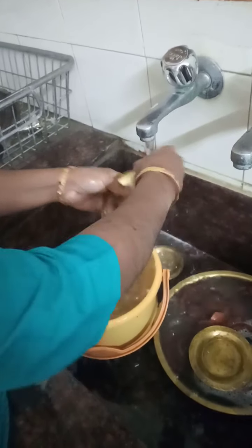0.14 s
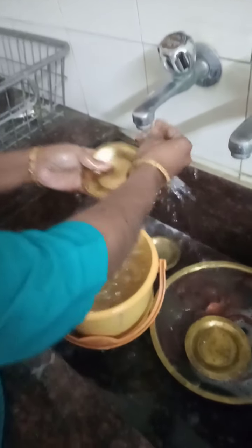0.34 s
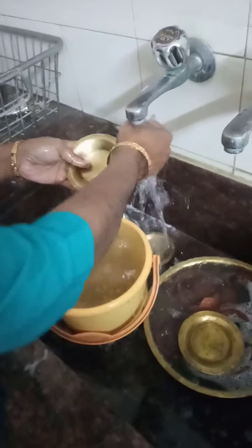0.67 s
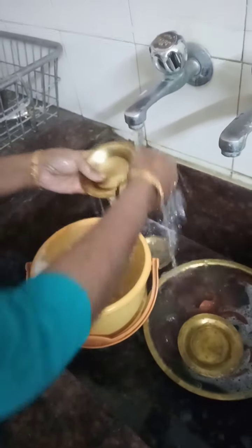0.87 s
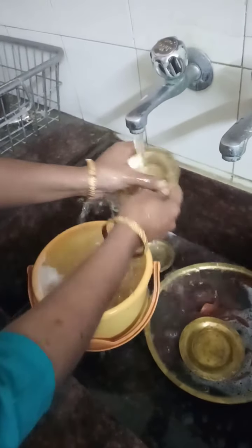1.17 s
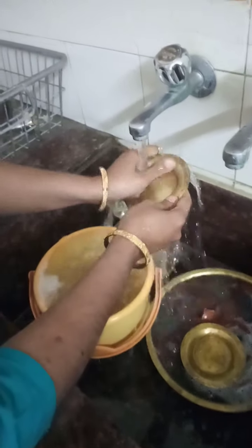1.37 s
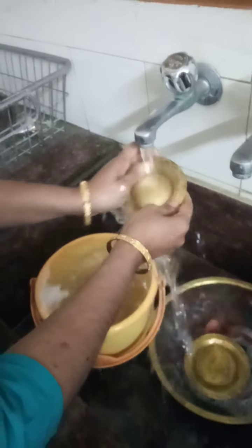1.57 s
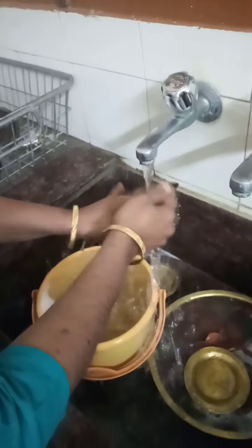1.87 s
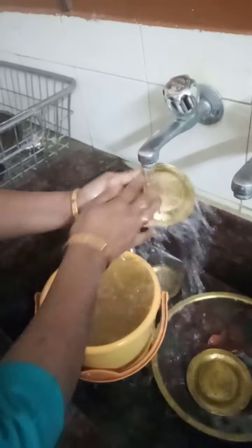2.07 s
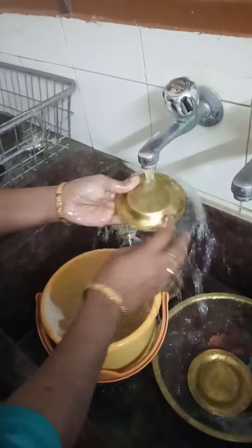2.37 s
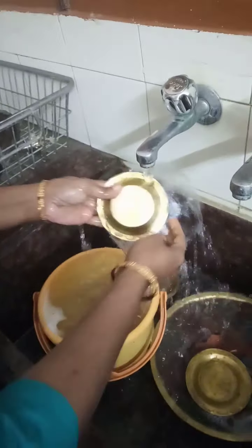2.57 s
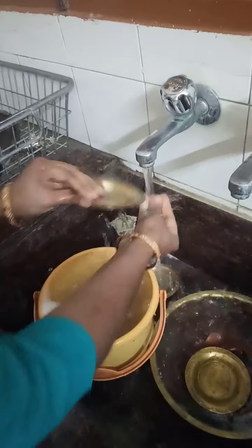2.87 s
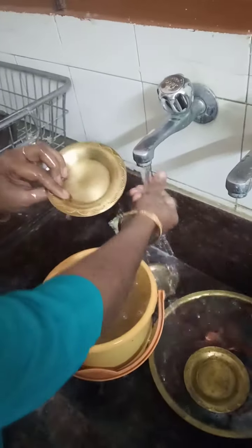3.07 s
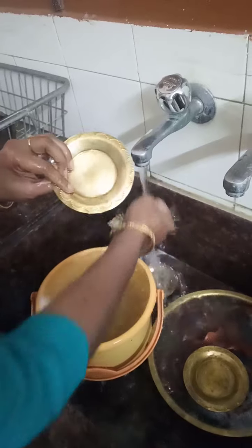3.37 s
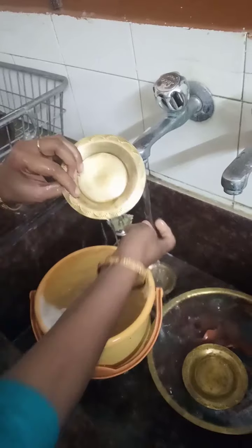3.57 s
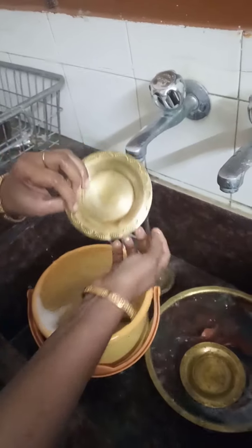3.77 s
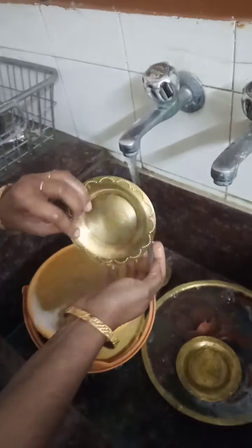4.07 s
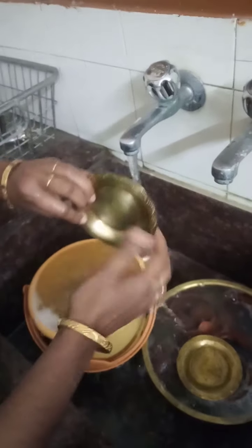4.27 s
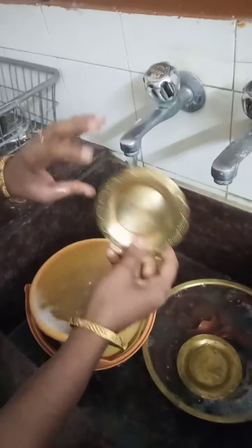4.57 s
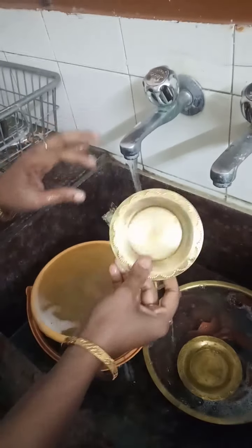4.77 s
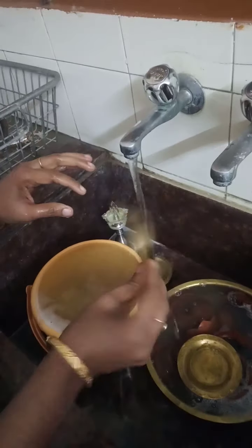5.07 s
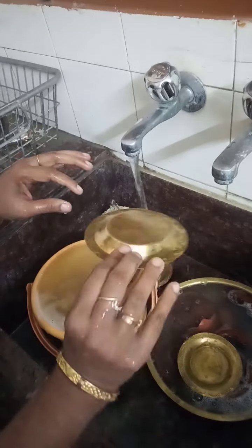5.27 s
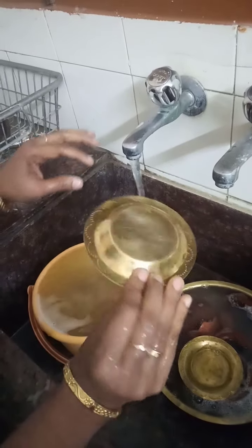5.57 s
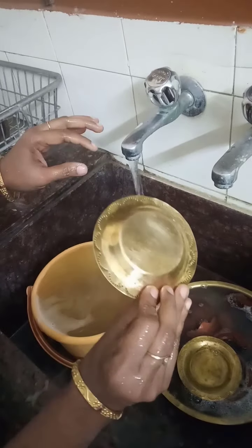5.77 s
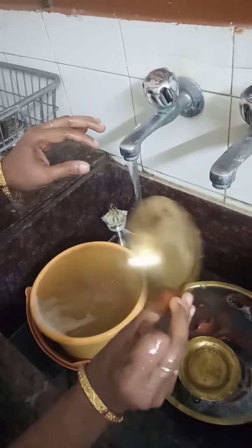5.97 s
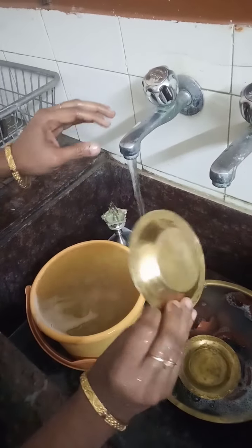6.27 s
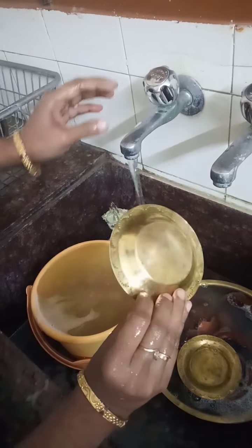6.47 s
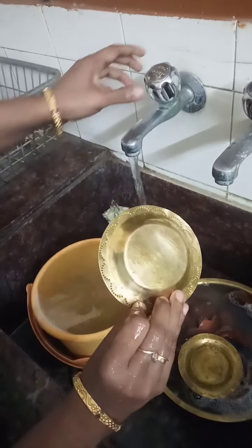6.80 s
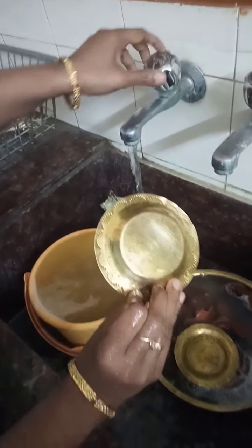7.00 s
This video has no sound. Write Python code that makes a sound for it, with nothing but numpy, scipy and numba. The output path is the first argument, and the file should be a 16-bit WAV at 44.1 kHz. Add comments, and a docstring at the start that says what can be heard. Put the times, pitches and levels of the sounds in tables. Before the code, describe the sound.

A running tap fizzes and spatters into a sink and bucket as a brass plate is rinsed, clinking now and then.

```python
"""Rinsing a brass plate

A small plate is rubbed and rinsed by hand under a tap, over a stone sink in a tiled kitchen.
Water gathers and spills off a few times a second as fizz, spray and slosh, all ringing bubbles;
lumps of it slap the sink and plop into a bucket. The stream drums on the plate, harder later on,
and excites its modes; a few hard clacks and two light knocks set the brass in free vibration."""
import sys
import numpy as np
from scipy import signal
from scipy.fft import rfft, irfft
from scipy.io import wavfile
from numba import njit

SR = 44100
rng = np.random.default_rng(int(sys.argv[2]) if len(sys.argv) > 2 else 0)


def transcribe(signal):
    """Save signal, clipped to [-1, 1], as a 16-bit WAV file at the path in sys.argv[1]."""
    frames = np.atleast_2d(signal).T
    limited = np.clip(frames, -1, 1)
    pcm = np.round(limited * 32767).astype(np.int16)
    wavfile.write(sys.argv[1], SR, pcm)


N = 314865
T = np.arange(N) / SR


def undb(db):
    """Amplitude ratio of a level in decibels."""
    return 10 ** (np.asarray(db) / 20)


def unit(x):
    """Normalisation to an rms of 1."""
    return x / np.sqrt(np.mean(x ** 2) + 1e-18)


def curve(table, column=1):
    """Gain envelope, interpolated in decibels between a table's times."""
    rows = np.array(table)
    return undb(np.interp(T, rows[:, 0], rows[:, column]))


def add(out, start, x):
    """Superposition of x on out from a start in seconds."""
    i = max(int(start * SR), 0)
    out[i:i + len(x)] += x[:max(N - i, 0)]


def wander(hz):
    """Random modulation: low-passed noise with an rms of 1."""
    return unit(signal.sosfilt(signal.butter(2, hz, fs=SR, output="sos"), rng.standard_normal(N)))


def colour(x, spectrum):
    """Minimum-phase filter through (Hz, dB) points, made by folding the cepstrum."""
    hz, db = np.transpose(spectrum)
    size = 2048
    bin_hz = np.arange(size // 2 + 1) * SR / size
    gain = undb(np.interp(np.log(bin_hz + 1), np.log(hz), db))
    cepstrum = irfft(np.log(gain))
    cepstrum[1:size // 2] *= 2
    cepstrum[size // 2 + 1:] = 0
    response = irfft(np.exp(rfft(cepstrum)))
    return signal.fftconvolve(x, response)[:len(x)]


def band(x, low_hz, high_hz):
    """Butterworth band-pass."""
    edges = [low_hz, max(high_hz, low_hz + 10)]
    return signal.sosfilt(signal.butter(2, edges, "band", fs=SR, output="sos"), x)


@njit
def ring_bubbles(start, hz, cycles, size, rise, onto):
    """Bubble resonance: each sine decays 60 dB in its cycles as its pitch gains the fraction rise."""
    out = onto.copy()
    for k in range(len(start)):
        length = int(cycles[k] * SR / hz[k]) + 2
        first, fade = int(start[k] * SR), np.exp(-6.9 / length)
        phase, amplitude = 0., size[k]
        for i in range(max(0, min(length, len(out) - first))):
            phase += 2 * np.pi * hz[k] * (1 + rise * i / length) / SR
            amplitude *= fade
            onset = min(phase / (2 * np.pi), 1.)
            out[first + i] += amplitude * onset * np.sin(phase)
    return out


def drop_sizes(chance, spread_db):
    """Exponential distribution of levels: many small drops and a few big ones."""
    return undb(-spread_db * np.log(1 - .985 * chance))


def impacts(spread_db, count):
    """Shot noise: droplets strike at random moments."""
    when, chance = rng.random((count, 2)).T
    size = drop_sizes(chance, spread_db) * (-1) ** np.arange(count)
    return np.bincount((when * N).astype(int), size, N)


def stray_events(flow, per_s):
    """Random arrivals: times, the flow's dB at each, and size and pitch deviates from -1 to 1."""
    when, size, pitch = rng.random((400, 3))[:int(per_s * N / SR)].T
    flow_db = 20 * np.log10(flow[(when * N).astype(int)])
    return when * N / SR, flow_db, 2 * size - 1, 2 * pitch - 1


def kitchen(x, room_db=-1.0, room_t60=0.31):
    """Reverberation: the tiled room adds an exponentially decaying tail to the direct sound."""
    t = T[:SR // 2]
    tail = rng.standard_normal(len(t)) * (t > .0015) * undb(-60 * t / room_t60)
    response = undb(room_db) * tail / np.linalg.norm(tail)
    response[0] = 1
    return signal.fftconvolve(x, response / np.linalg.norm(response))[:N]


def moving_splash(x, spots_per_s=24, count=10):
    """Reflections depend on position: the hands move the splash from spot to spot."""
    shares = (np.maximum(1 - np.abs((spots_per_s * T - k) % count - 1), 0) for k in range(count))
    return sum(kitchen(x * share) for share in shares)


def sink(x):
    """Early reflections, as all-pass filters, smear each tick without colouring it."""
    for lag in (7, 13, 23):
        loop = np.r_[1, np.zeros(lag - 1), -.6]
        x = signal.lfilter(loop[::-1], loop, x)
    return x


# Spectrum of the room's background. Each row: frequency in Hz, gain in dB.
RUMBLE_SPECTRUM = [(25, -6), (60, 3), (110, 13.5), (200, 1), (400, 7.5), (1000, 2), (4000, -10),
                   (16000, -2.5)]

def rumble():
    """Ambient noise: faint, steady and weighted to low frequencies."""
    return undb(-75.0) * unit(colour(rng.standard_normal(N), RUMBLE_SPECTRUM))


# Low hollow tones of the plate, rung by the stream. Each row: start in seconds, mid-tone level in dB,
# length in seconds, upper tone relative to the lower in dB.
LOW_PLATE_TONES = [(0.138, -83.5, 0.17, 18), (0.46, -66.5, 0.094, -14), (2.611, -58.5, 0.013, -20),
                   (3.316, -61, 0.08, -17), (4.103, -65, 0.17, -16), (4.498, -53, 0.039, -8),
                   (4.622, -61, 0.022, -16), (4.709, -54.5, 0.07, -34), (5.069, -66, 0.081, -21),
                   (5.127, -49.5, 0.022, -24), (5.644, -63, 0.11, -8), (6.314, -50.5, 0.033, -3.5),
                   (6.546, -54, 0.06, -2.5), (6.793, -54, 0.065, -1)]

def low_plate_tones(lower_hz=219.4 + 4.2, upper_hz=324.8, rise_s=0.0037, fall_s=0.014, sag_db_per_s=40):
    """Modal vibration: the stream rings two low modes of the plate, which swell, waver and die away."""
    out, t = np.zeros(N), T[:SR // 4]
    roughness = unit(undb(4 * wander(35)))
    drift = 1 + 0.069 * wander(65)
    for start, db, length, upper_db in LOW_PLATE_TONES:
        now = slice(int(start * SR), int(start * SR) + len(t))
        envelope = (1 - np.exp(-t / rise_s)) * np.exp(-np.maximum(t - length, 0) / fall_s)
        gain = undb(db - sag_db_per_s * (t - length / 2))
        phase_per_hz = 2 * np.pi * np.cumsum(drift[now]) / SR
        tones = np.sin(lower_hz * phase_per_hz) + undb(upper_db) * np.sin(upper_hz * phase_per_hz)
        add(out, start, gain * envelope * roughness[now] * tones)
    return kitchen(out, room_db=-12, room_t60=0.26)


# Hollow notes of the plate. Each row: start and length in seconds, level in dB, pitch in Hz.
HOLLOW_NOTES = [(4.36, 0.12, -52.5, 2370), (5.08, 0.095, -52, 2380), (5.61, 0.074, -54, 3340),
                (6.337, 0.11, -64, 1610), (6.637, 0.12, -54, 2900), (6.99, 0.065, -55, 3420)]

def hollows(width_hz=360):
    """Resonance: the stream excites one narrow band of the plate, swelling and fading as it tilts."""
    out, blows = np.zeros(N), impacts(spread_db=-1.5, count=6000)
    for start, length, db, hz in HOLLOW_NOTES:
        now = slice(int(start * SR), int((start + length) * SR))
        note = unit(band(blows[now], hz - width_hz / 2, hz + width_hz / 2))
        add(out, start, undb(db) * note * np.sin(np.linspace(0, np.pi, len(note))))
    return out


# Modes of the hand-held plate. Each row: frequency in Hz, bandwidth in Hz, gain in dB.
PLATE_MODES = [(219.4, 38, 2), (305.5, 44, -4), (428, 17, -3), (526, 40, -4), (1029, 104, 3.5),
               (1226, 100, 2), (1627, 56, -4.5), (2720, 25, -10)]
# Drumming of the stream on the plate. Each row: time in seconds, relative level in dB.
DRUM_LEVELS = [(0, -75.5), (2.0, -66.5), (3.7, -60.5), (4.0, -68.5), (4.55, -53.5), (4.8, -58.5),
               (5.3, -70.5), (5.6, -62), (6.2, -55), (6.5, -63.5), (7.14, -57)]

def drumming(waver_db=4.5, waver_hz=6):
    """Forced vibration: drops drive the brass; each mode wavers as the stream strays over it."""
    blows = impacts(spread_db=4.5, count=8000)
    modes = sum(undb(db + waver_db * wander(waver_hz)) * band(blows, hz - width / 2, hz + width / 2)
                for hz, width, db in PLATE_MODES)
    return undb(-4.0) * unit(modes) * curve(DRUM_LEVELS)


# Light knocks on the plate. Each row: start in seconds, level in dB.
KNOCK_EVENTS = [(4.153, -44), (5.375, -47.5)]
# Modes a knock excites. Each row: frequency in Hz, gain in dB, 60 dB decay time in seconds.
MIDDLE_MODES = [(1004, 1, 0.17), (1088, 0.5, 0.081), (1216, -2.5, 0.15), (1310, -25, .09),
                (2025, -4, 0.073)]

def knocks(thud_t60=0.19, contact_s=.002):
    """Damped free vibration: a knock gives a dull plunk and a ring that the fingers cut short."""
    out, t = np.zeros(N), T[:SR // 2]
    brass = sum(undb(db - 60 * t / t60) * np.sin(2 * np.pi * hz * t) for hz, db, t60 in MIDDLE_MODES)
    for start, db in KNOCK_EVENTS:
        burst = rng.standard_normal(len(t)) * undb(-6 - 60 * t / thud_t60)
        thud = 6 * band(burst, 1020, 1260)
        add(out, start, undb(db) * (brass + thud) * (1 - np.exp(-t / contact_s)))
    return out


# Clacks, as of finger rings on wet brass. Each row: start in seconds, level in dB,
# spectral tilt in dB per octave.
CLACK_EVENTS = [(1.597, -34, 11), (2.45, -41, 18), (2.7301, -30, -1), (3.4062, -29.5, -9),
                (3.6208, -33.5, 8), (5.705, -33.5, 4.5), (5.836, -35, -2), (6.4408, -39, 9)]
# Modes a clack excites. Each row: frequency in Hz, gain in dB, 60 dB decay time in seconds.
UPPER_MODES = [(1925, -12, .12), (2320, -14, 0.18), (2733, -10, .08), (3430, -12, .06), (5280, -15, .04),
               (5930, -3, 0.025), (6400, -1, 0.024)]

def clacks(crack_s=0.00023, pivot_hz=3970):
    """Impulse excitation: a brief hard contact cracks and rings high modes, damped by the wet hand."""
    out, t = np.zeros(N), T[:SR // 4]
    for start, db, tilt in CLACK_EVENTS:
        brass = sum(undb(mode_db + tilt * np.log2(hz / pivot_hz) - 60 * t / t60)
                    * np.sin(2 * np.pi * hz * t) for hz, mode_db, t60 in UPPER_MODES)
        crack = band(rng.standard_normal(len(t)) * np.exp(-t / crack_s), 3000, 8100)
        add(out, start, undb(db) * (brass + 2 * undb(7) * crack))
    return kitchen(band(out, 1400, 12000), room_db=-4.5)


# Slops into the bucket. Each row: start in seconds, level in dB, 60 dB decay time in seconds,
# lower and upper band edges in Hz.
SLOP_EVENTS = [(0.307, -41, 0.23, 228, 900), (.33, -51, 0.37, 92, 204), (1.07, -48, 0.36, 460, 1860),
               (1.163, -47.5, 0.12, 295, 470), (1.996, -41, 0.19, 606, 2260), (2.439, -71, 0.42, 55, 180),
               (2.73, -42, 0.54, 630, 2260), (3.102, -64, 0.42, 54.7, 251), (3.149, -57, 0.44, 283, 450),
               (3.402, -29.5, 0.12, 1800, 3060), (5.76, -56, 1, 274, 490), (6.015, -52, 0.73, 90, 121.9),
               (6.043, -53, 0.35, 1370, 1700), (6.075, -51, 0.37, 393, 630)]

def slops():
    """Decaying band-limited noise: heavy spills churn the bucket in short dull bursts."""
    out, t = np.zeros(N), T[:SR // 2]
    for start, db, t60, low_hz, high_hz in SLOP_EVENTS:
        churn = unit(band(rng.standard_normal(len(t)), low_hz, high_hz))
        add(out, start, undb(db - 60 * t / t60) * churn)
    return out


def blips(flow, per_s=19, low_hz=1420, high_hz=4500, cycles=20):
    """Random air entrainment: rows of lesser bubbles, louder when the water sloshes."""
    start, flow_db, size, pitch = stray_events(flow, per_s)
    db = flow_db - 8.5 + 4 * size
    hz = low_hz * (high_hz / low_hz) ** ((pitch + 1) / 2)
    return np.column_stack([start, db, hz, np.full(len(start), cycles)])


# Single ringing bubbles, from low plops to high plinks. Each row: start in seconds, level in dB,
# pitch in Hz, ringing time in cycles.
RINGING_BUBBLES = [(.052, -45, 962, 79), (.128, -40.5, 1490, 50), (.176, -41.5, 1055, 80),
                   (.237, -31, 708, 94), (.2405, -18.5, 3880, 36), (.376, -33, 840, 37),
                   (.492, -37, 1564, 64), (.584, -27.5, 2980, 35), (.731, -42.5, 826, 270),
                   (.742, -47, 517, 73), (.782, -39, 1950, 110), (.875, -38, 995, 55),
                   (.899, -24.5, 2670, 41), (1.051, -36.5, 693, 27), (1.142, -26, 4700, 56),
                   (1.199, -31.5, 1694, 100), (1.36, -44.5, 1316, 66), (1.476, -44, 1080, 49),
                   (1.483, -20.5, 5350, 65), (1.515, -41, 850, 64), (1.521, -21, 5100, 55),
                   (1.607, -26, 2880, 44), (1.84, -22.5, 4670, 100), (2.243, -25.5, 4000, 130),
                   (2.287, -38.5, 749, 74), (2.346, -43, 1597, 110), (2.456, -35.5, 1580, 53),
                   (2.541, -30, 4730, 120), (2.648, -42, 621, 180), (2.685, -38, 1410, 55),
                   (3.014, -34, 1334, 140), (3.092, -25, 3170, 53), (3.402, -36.5, 1860, 47),
                   (3.524, -25.5, 1970, 55), (3.646, -22, 2460, 47), (3.69, -34, 950, 32),
                   (3.757, -27, 2740, 32), (3.824, -51, 602, 39), (4.078, -54.5, 540, 45),
                   (4.489, -49.5, 527, 55), (4.664, -44, 520, 54), (5.385, -60, 616, 100),
                   (6.042, -31.5, 1390, 61)]

def plops(flow, companions=3, companion_db=-12, lag_s=0.012, pitch_spread=0.09):
    """Bubble resonance in standing water: each lone bubble rings and sheds a few companions."""
    start, db, hz, cycles = np.vstack([RINGING_BUBBLES, blips(flow)]).T.copy()
    tones = ring_bubbles(start, hz, cycles, undb(db), rise=0.05, onto=np.zeros(N))
    for _ in range(companions):
        late, detune = rng.standard_normal((len(start), 2)).T
        tones = ring_bubbles(start + lag_s * np.abs(late), hz * np.exp(pitch_spread * detune),
                             cycles / 2, undb(db + companion_db), rise=0.38, onto=tones)
    roughness = 1 + 0.23 * wander(260)
    return band(tones * roughness, 620, 7300)


def bubble_cloud(low_hz, high_hz, cycles, spread_db, rise, count):
    """Incoherent superposition: a steady cloud of bubbles of mixed sizes."""
    when, pitch, life, chance = rng.random((count, 4)).T
    hz = low_hz + (high_hz - low_hz) * pitch
    size = drop_sizes(chance, spread_db)
    return ring_bubbles(when * N / SR, hz, cycles * (.5 + life), size, rise, np.zeros(N))


# Patter of the stream in the bucket. Each row: time in seconds, relative level in dB.
PATTER_LEVELS = [(0, -65.5), (.5, -54), (.68, -75), (.85, -60), (1.02, -63.5), (1.15, -45), (1.32, -58),
                 (1.55, -54.5), (2.2, -55.5), (2.95, -60.5), (3.2, -55), (3.7, -62.5), (3.95, -74),
                 (5.55, -80), (5.8, -56), (6.15, -67), (6.6, -73), (7.14, -58.5)]

def patter():
    """Low-pitched bubble resonance: the stream patters dully into the bucket."""
    cloud = bubble_cloud(450, 1188, cycles=34.0, spread_db=2.5, rise=0.22, count=2500)
    return unit(band(cloud, 470, 1600)) * curve(PATTER_LEVELS)


def slosh():
    """Medium bubbles resonate in the midrange and merge into a slosh."""
    cloud = bubble_cloud(1102, 3314, cycles=26.0, spread_db=2, rise=0.093, count=5000)
    return unit(band(cloud, 1600, 13000))


# Spectrum of spray and mist. Each row: frequency in Hz, gain in dB.
SPRAY_SPECTRUM = [(600, -41), (2500, -26.5), (6000, 14), (8000, 0.5), (10000, 5.5), (12500, 1.5),
                  (16000, -3.5)]

def spray():
    """Tiny bubbles resonate high and decay so fast that they are heard as ticks."""
    cloud = bubble_cloud(6300, 15000, cycles=12.0, spread_db=6.5, rise=0.055, count=16000)
    return unit(colour(cloud, SPRAY_SPECTRUM))


def small_splats(flow, per_s=14, centre_hz=5260, mist_db=-18):
    """Random impacts: rows of lesser lumps, which hit harder when more water falls."""
    start, flow_db, size, pitch = stray_events(flow, per_s)
    db = flow_db + 8.5 + 3.5 * size
    hz = centre_hz * np.exp(0.09 * pitch)
    return [(*lump, mist_db) for lump in zip(start, db, hz)]


# Big lumps of water slapping the sink. Each row: start in seconds, level in dB,
# bubble pitch in Hz, mist gain in dB.
BIG_SPLATS = [(.2388, -26.5, 3570, -18), (.3075, -28.5, 6100, -12.5), (.3655, -31, 5600, -19),
              (.587, -26.5, 5530, -27), (.6179, -30, 5600, -32), (.6549, -35, 4300, -17),
              (.7814, -33, 6530, -34), (.802, -25, 4260, -35), (.859, -29, 4170, -32),
              (.8814, -25.5, 4300, -30), (.9532, -32, 4530, -20), (1.1408, -26, 4740, -23),
              (1.482, -31.5, 5400, -16), (1.5055, -31, 2910, -28), (1.5638, -27, 4300, -16),
              (1.6072, -28.5, 2900, -20), (1.654, -31, 3480, -22), (1.821, -30, 4950, -30),
              (1.8396, -35, 5060, -27), (1.868, -27.5, 5060, -26), (1.9095, -24, 2950, -18),
              (1.9714, -24, 3120, -20), (1.979, -30, 6540, -22), (2.007, -31, 6500, -20),
              (2.092, -27, 6300, -28), (2.1025, -24.5, 3970, -28), (2.1331, -30, 3600, -21),
              (2.2333, -22, 4640, -25), (2.4177, -31.5, 4980, -18), (2.5398, -28, 4900, -12),
              (2.6389, -29, 7050, -35), (2.6783, -24.5, 5300, -38), (2.7302, -22.5, 4100, -33),
              (2.766, -30, 5340, -33), (2.7921, -28, 5840, -31), (2.817, -28, 6500, -30),
              (2.9705, -22.5, 5280, -41), (3.0887, -23, 6200, -26), (3.1133, -32, 3910, -25),
              (3.3556, -31.5, 5900, -32), (3.4052, -21.5, 5960, -28), (3.459, -30, 5500, -24),
              (3.4945, -25, 3850, -28), (3.6204, -24.5, 6500, -11.5), (3.6466, -25, 3620, -33),
              (3.6564, -21.5, 5540, -19.5), (3.738, -33.5, 6170, -23), (3.883, -33, 5060, -28),
              (3.959, -35.5, 5700, -19), (4.1221, -36, 6200, -17), (4.261, -30.5, 5570, -14),
              (4.3655, -28.5, 5460, -19), (4.3944, -30.5, 5830, -14.5), (4.4498, -27, 5060, -17),
              (4.4888, -32.5, 5330, -15), (4.54, -35, 6000, -10), (4.6025, -31.5, 6600, -20),
              (4.629, -37, 6200, -15), (4.728, -35, 5240, -32), (4.82, -36, 5970, -9.5),
              (4.8705, -27.5, 3810, -16), (4.952, -27, 4950, -16.5), (5.02, -35, 4500, -18),
              (5.494, -34, 5950, -11), (5.671, -26.5, 5300, -16.5), (5.705, -24, 3200, -27),
              (5.8363, -31, 2920, -15), (6.0188, -35, 4840, -17), (6.4119, -37, 5900, -16),
              (6.4408, -26.5, 5100, -26), (6.615, -30, 5970, -12.5), (6.6632, -30, 6230, -27),
              (6.8397, -31, 6860, -15), (6.8529, -24.5, 6540, -18), (6.8812, -32.5, 5970, -7),
              (6.921, -31, 4700, -28), (7.011, -36.5, 3640, -19), (7.0499, -36.5, 5900, -12),
              (7.0749, -35.5, 6100, -10), (7.105, -34.5, 4300, -25)]
# Spectrum of a splat's body. Each row: frequency in Hz, gain in dB.
SPLAT_SPECTRUM = [(150, -41), (700, -32), (1800, -2), (4500, -1.5), (6700, 3), (7800, -13.5), (10000, -9.5),
                  (16000, -39)]

def splats(flow, lead_db=2.0, follower_db=-12.5, linger_s=.016, cycles=32.0, count=24):
    """Impact and entrainment: a lump ticks, traps a main bubble and followers, and throws up mist."""
    body, mist, t = np.zeros(N), np.zeros(N), T[:SR // 6]
    follows = np.arange(count) > 0
    for start, db, hz, mist_db in list(BIG_SPLATS) + small_splats(flow):
        droplets = rng.standard_normal(len(t)) * (np.exp(-t / 0.0053) + 0.2 * np.exp(-t / 0.019))
        tick = 2 * undb(-3) * band(droplets, hz / 1.24, hz * 1.24)
        delay = linger_s * rng.exponential(size=count) * follows
        pitch = hz * np.exp(0.064 * rng.standard_normal(count) * follows)
        size = undb(np.where(follows, follower_db, lead_db)) * np.exp(-delay / 0.1)
        splat = ring_bubbles(delay, pitch, np.full(count, cycles), size, rise=0.039, onto=tick)
        add(body, start, undb(db) * splat)
        add(mist, start, undb(db + mist_db + 6) * droplets)
    return undb(1.5) * colour(body, SPLAT_SPECTRUM) + colour(mist, SPRAY_SPECTRUM)


# The stream between spills. Each row: time in seconds, relative fizz, spray and slosh levels in dB.
STREAM_LEVELS = [(0, -47, -52, -53.5), (.4, -44.5, -55.5, -42.5), (.68, -42, -49, -53.5),
                 (1.3, -44.5, -51.5, -46), (1.8, -47, -51.5, -54.5), (2.4, -44.5, -48.5, -53),
                 (3.25, -41.5, -51.5, -55), (3.8, -47.5, -51.5, -47), (4.0, -49, -53, -63),
                 (4.4, -52, -59, -59), (4.79, -50, -61, -81), (5.2, -48.5, -51.5, -73),
                 (5.57, -52.5, -54.5, -66), (5.8, -55, -50.5, -67), (6.25, -44.5, -54, -61.5),
                 (6.75, -46.5, -52.5, -62.5), (7.14, -56, -51, -63)]
# Spills off hands and plate. Each row: start and hold in seconds, relative fizz, spray and slosh
# levels in dB, bubble pitch in Hz.
SPILL_EVENTS = [(0, 0.015, -35.5, -68, -40, 5140), (0.266, 0.17, -44, -68, -45, 5260),
                (0.583, 0.072, -34.5, -46.5, -78, 5100), (0.726, 0.23, -57, -45.5, -48.5, 4770),
                (0.978, 0.04, -37, -48, -68, 5240), (1.058, 0.13, -37, -48.5, -40.5, 4680),
                (1.496, 0.012, -35.5, -66, -44, 3710), (1.575, 0.12, -43.5, -47, -42, 4350),
                (1.797, 0.059, -39, -64, -59, 4950), (1.909, 0.055, -38.5, -48, -51, 2930),
                (1.972, 0.084, -37, -52, -41, 6000), (2.104, 0.074, -38, -45.5, -45, 3970),
                (2.223, 0.054, -42.5, -61, -47, 4360), (2.423, 0.036, -35.5, -49, -46, 5460),
                (2.56, 0.079, -40, -44, -58, 4740), (2.585, 0.31, -46.5, -50, -49, 4480),
                (2.856, 0.073, -40.5, -45, -58, 5050), (3.039, 0.27, -44, -67, -52.5, 4880),
                (3.397, 0.18, -38, -45.5, -45.5, 4700), (3.623, 0.13, -39.5, -60, -45, 4600),
                (4.149, 0.21, -43, -48.5, -54.5, 5800), (4.373, 0.14, -41.5, -50, -52.5, 5530),
                (4.534, 0.16, -43, -51.5, -57, 5900), (4.84, 0.091, -44, -47, -55, 5340),
                (4.948, 0.11, -40.5, -50, -59, 5070), (5.083, 0.17, -40.5, -47.5, -54, 4780),
                (5.337, 0.13, -54, -52, -58.5, 5400), (5.443, 0.058, -42.5, -58, -56, 5740),
                (5.606, .04, -45.5, -44, -55, 4800), (5.67, 0.16, -41, -49, -58, 4950),
                (5.832, 0.1, -47, -48, -53, 4470), (5.96, 0.18, -45, -51, -76, 5320),
                (6.4, 0.086, -40, -66, -78, 5350), (6.606, 0.044, -39, -45.5, -59, 5500),
                (6.846, 0.13, -43.5, -45.5, -59, 5500), (7.05, 0.043, -51, -58, -53.5, 5100)]

def surge(layer, rise_s=0.00072, fall_s=0.026):
    """Incoherent sources add in power: spills raise the gain of layer 0 (fizz), 1 (spray), 2 (slosh)."""
    power, t = curve(STREAM_LEVELS, column=1 + layer) ** 2, T[:SR]
    for start, hold, *levels_db, _ in SPILL_EVENTS:
        envelope = (1 - np.exp(-t / rise_s)) * np.exp(-np.maximum(t - hold, 0) / fall_s)
        add(power, start, (undb(levels_db[layer]) * envelope) ** 2)
    return np.sqrt(power)


def froth(cycles=24, pitch_spread=0.26, core_spread=0.065, core_share=0.3, count=18000):
    """Size sets resonance: each spill traps a core of like bubbles, giving it a wavering pitch."""
    when, life, chance, kind = rng.random((count, 4)).T
    drift = 0.1 * wander(35)[(when * N).astype(int)]
    start = when * N / SR
    spill_start, *_, spill_hz = np.transpose(SPILL_EVENTS)
    latest_spill = np.maximum(np.searchsorted(spill_start, start) - 1, 0)
    spread = np.where(kind < core_share, core_spread, pitch_spread)
    hz = spill_hz[latest_spill] * np.exp(drift + spread * rng.standard_normal(count))
    size = drop_sizes(chance, spread_db=1.6) * np.sqrt(hz)  # small bubbles are brief but strong
    return ring_bubbles(start, hz, cycles * (.5 + life), size, rise=0.087, onto=np.zeros(N))


# Spectrum of the fizz. Each row: frequency in Hz, gain in dB.
FIZZ_SPECTRUM = [(500, -21), (1200, -36), (2200, 5.5), (4500, 2.5), (6800, 0.5), (7800, -1.5), (16000, -38)]
# Coarse part of the fizz. Each row: time in seconds, gain in dB.
COARSE_GAINS = [(0, 2.5), (3.8, -2), (4.0, -7), (4.6, 3.5), (4.68, -3), (4.73, -24), (4.83, -19), (4.88, 4),
                (5.15, -3), (5.3, -6), (5.6, 2.5), (5.9, -2), (6.3, -3.5), (6.45, -3), (7.14, 5)]

def fizz(crossover_hz=3600):
    """Froth in two bands: the coarse, lower one drops out as water slides smoothly off the plate."""
    whole = unit(colour(froth(), FIZZ_SPECTRUM))
    fine = signal.sosfiltfilt(signal.butter(5, crossover_hz, "high", fs=SR, output="sos"), whole)
    return fine + (whole - fine) * curve(COARSE_GAINS)


def flutter(depth_db=2, lump_s=0.0072, count=500):
    """Amplitude modulation of a broken stream: the gain jumps as each lump arrives, then sags."""
    arrivals = np.bincount(rng.integers(0, N, count), minlength=N)
    lumps = signal.lfilter([1], [1, -np.exp(-1 / (lump_s * SR))], arrivals)
    return undb(depth_db * unit(lumps - lumps.mean()))


def running_water(fizz_gain, spray_gain, slosh_gain):
    """Superposed bubble clouds: the fizz, the spray and the duller pair flutter independently."""
    fizzing = undb(-4.5) * fizz() * fizz_gain
    spraying = undb(-0.5) * spray() * spray_gain
    dull = undb(-4.5) * slosh() * slosh_gain + undb(-3.5) * patter()
    return fizzing * flutter() + spraying * flutter() + dull * flutter()


def scene():
    """Superposition of water and plate in the kitchen, over a faint rumble."""
    fizz_gain, spray_gain, slosh_gain = (surge(layer) for layer in range(3))
    splash = running_water(fizz_gain, spray_gain, slosh_gain) + splats(fizz_gain)
    water = moving_splash(sink(splash) + slops())
    plops_and_knocks = kitchen(plops(slosh_gain) + knocks(), room_db=0.0, room_t60=0.41)
    brass = clacks() + drumming() + hollows() + low_plate_tones()
    return (water + plops_and_knocks + brass + rumble())[None]


def record(dry):
    """Band limiting: a steep low-pass removes the treble above 15950 Hz."""
    return signal.sosfilt(signal.ellip(10, .2, 70, 15950, fs=SR, output="sos"), dry)


dry = scene()
out = record(dry)
transcribe(out)
```